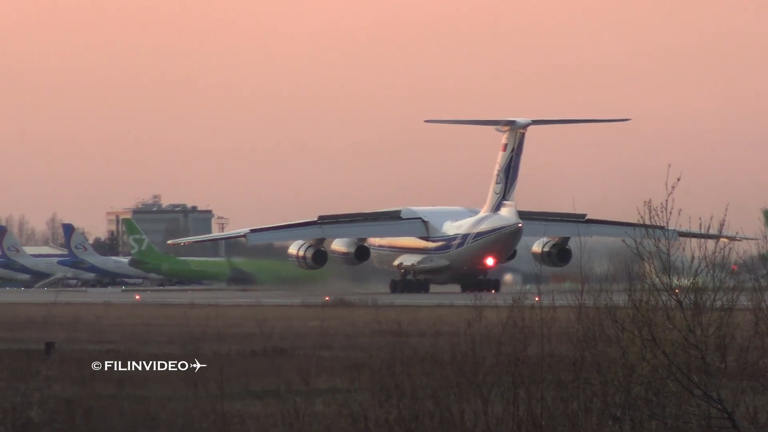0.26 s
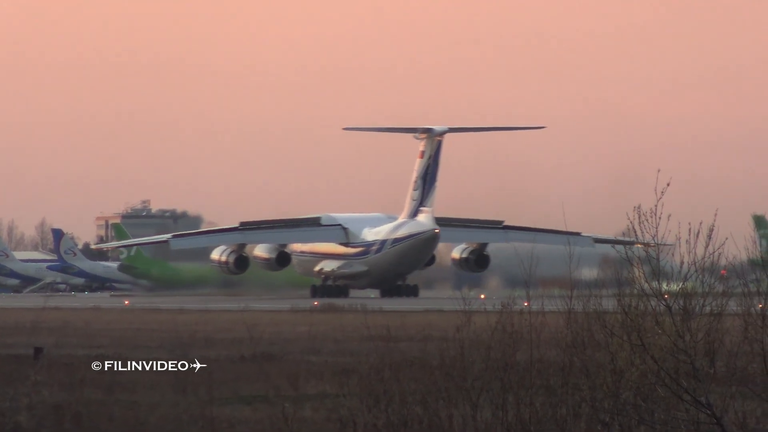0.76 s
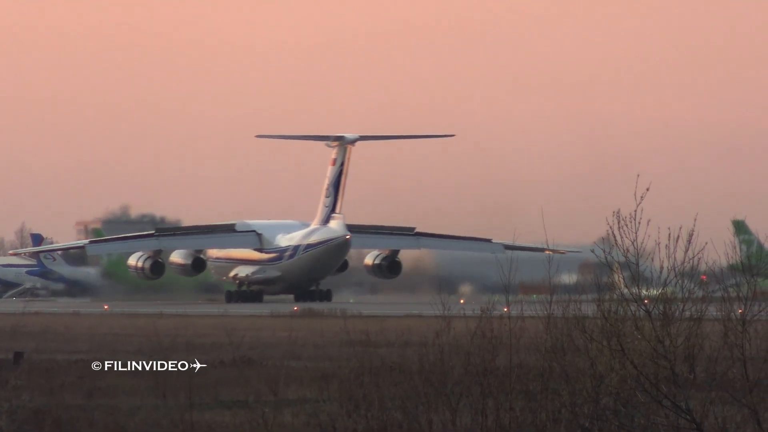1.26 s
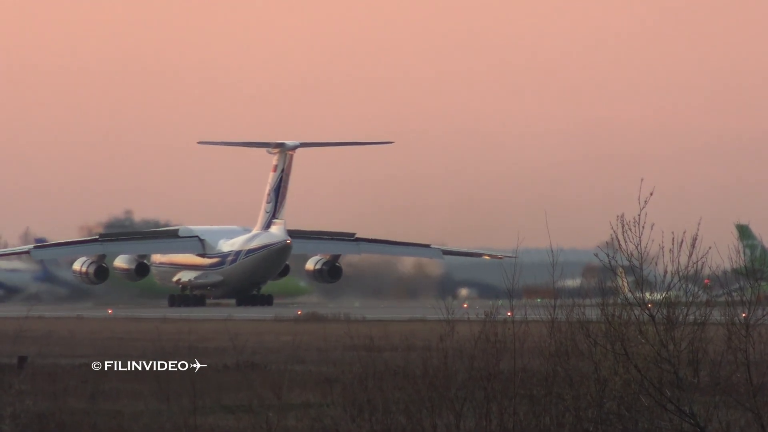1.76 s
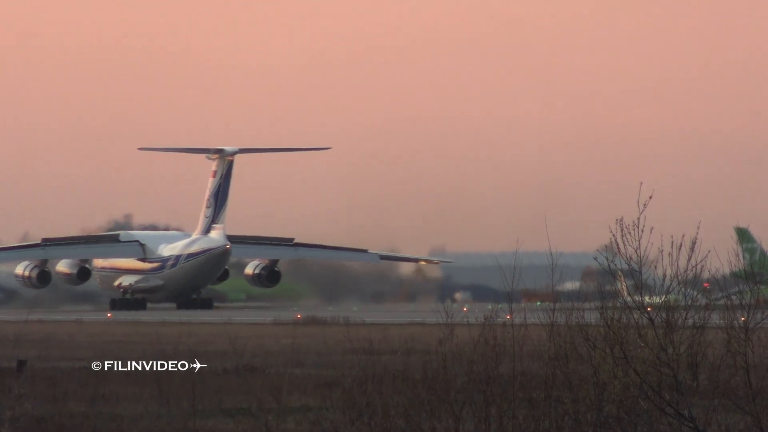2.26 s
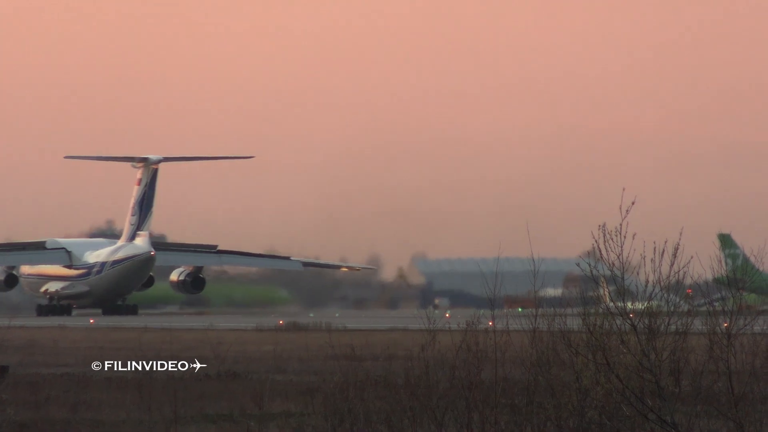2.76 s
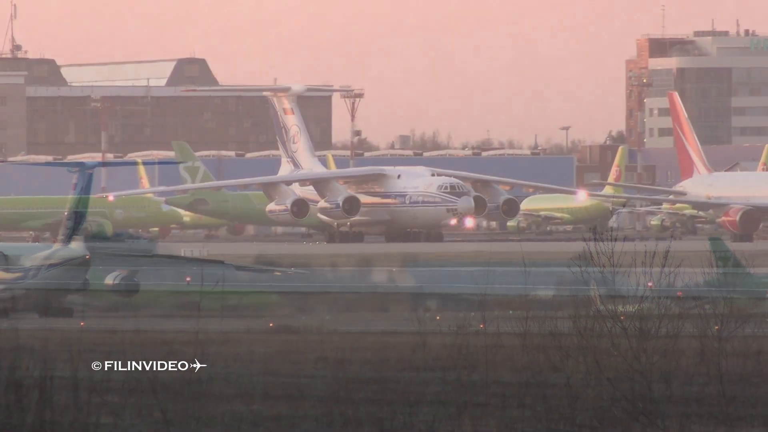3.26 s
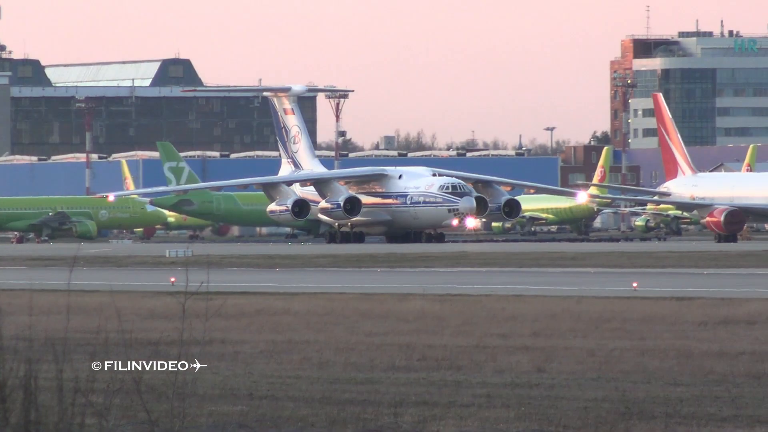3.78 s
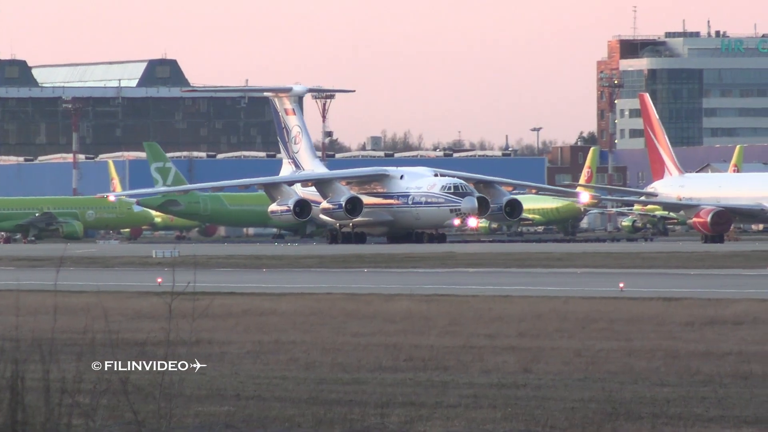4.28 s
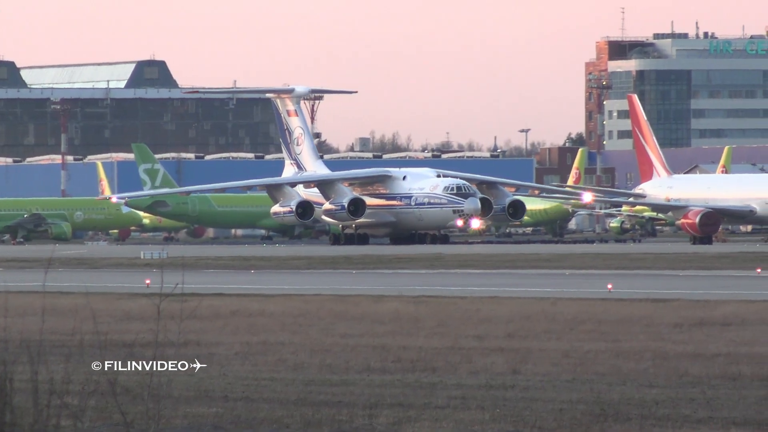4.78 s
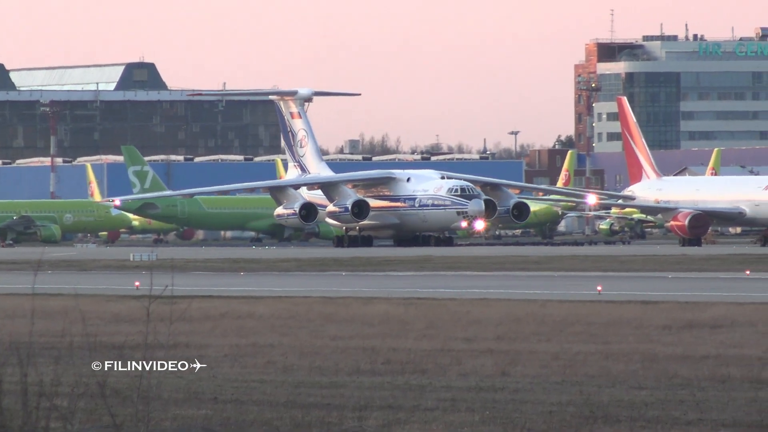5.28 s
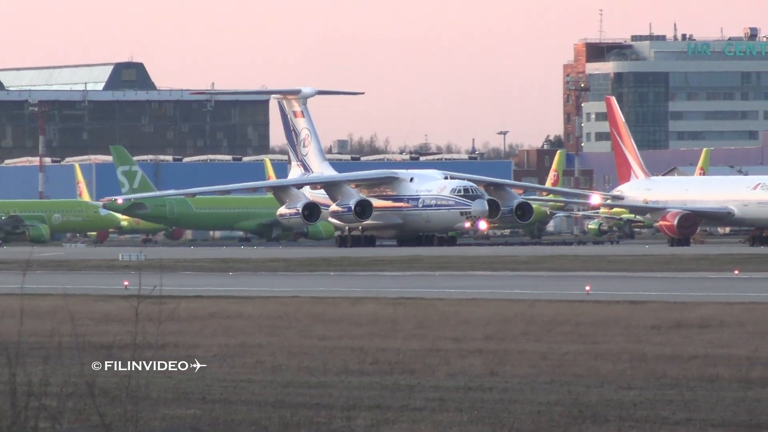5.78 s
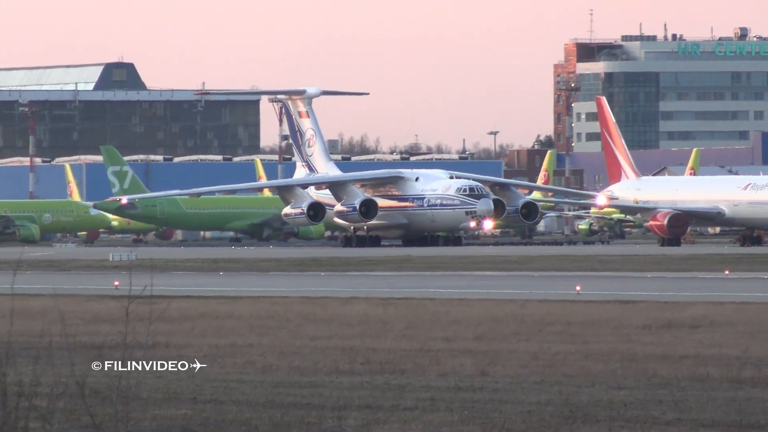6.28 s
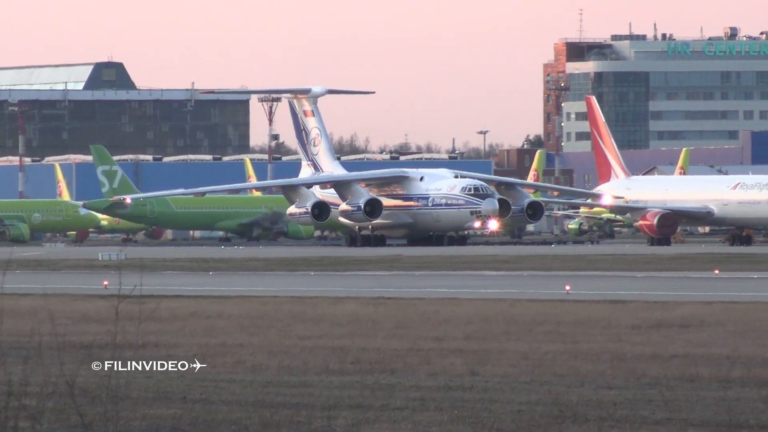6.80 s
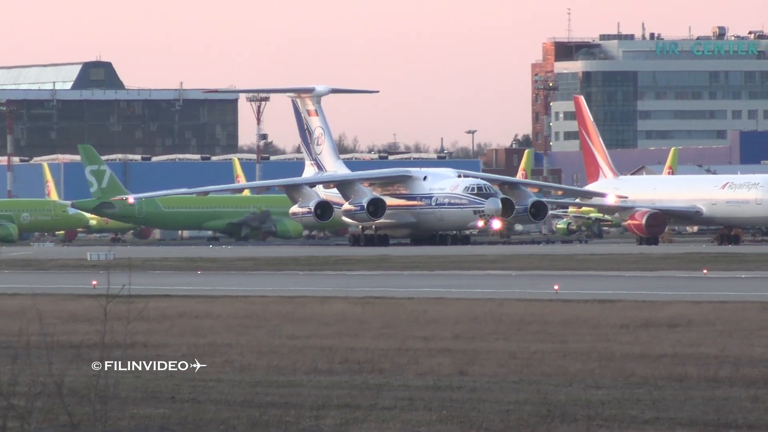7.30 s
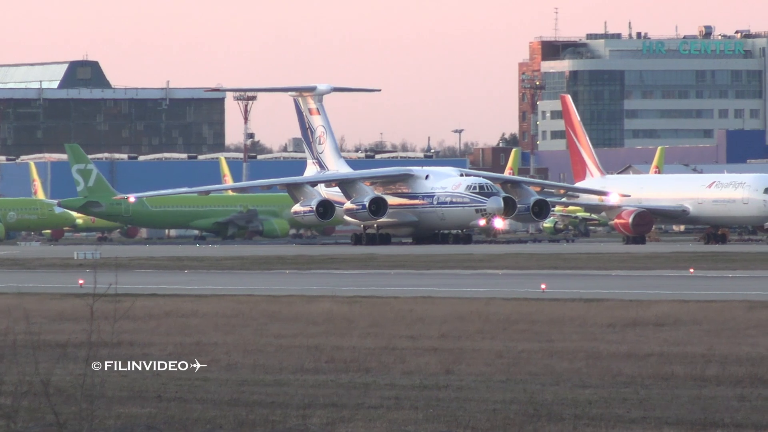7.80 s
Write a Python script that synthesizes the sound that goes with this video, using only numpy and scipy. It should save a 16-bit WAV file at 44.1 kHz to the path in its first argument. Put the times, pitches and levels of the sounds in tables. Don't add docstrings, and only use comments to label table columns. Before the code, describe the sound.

A distant four-engine jet in reverse thrust dominates an open airfield, heard through a camera microphone. From 0 s the roar is loud, broad and low-mid heavy, with little treble, wavering in rapid surges and dips, especially in the first second and again around 2.2 s. It eases slowly until about 5.5 s, then sinks more clearly to the end at 8 s, growing duller. Soft low wind puffs flutter on the microphone, most around 4-4.7 s. Tiny rustles begin near 1.5 s; from 4 to 5 s fingers shift with faint rustles, dull thumps and a short creak at 4.5 s. At 5.53 s a hard knock and a sharp, very brief crackling snap stand out. Small creaks follow, then cloth rubs thinly from 6.9 to 8 s, with a tiny click at 7.58 s. Faint hiss, patchy at first, steadily emerges as the roar falls.

```python
import sys
import numpy as np
from scipy import signal
from scipy.fft import rfft, irfft, next_fast_len
from scipy.io import wavfile
from scipy.ndimage import uniform_filter1d, minimum_filter1d, map_coordinates

SR = 44100
rng = np.random.default_rng(int(sys.argv[2]) if len(sys.argv) > 2 else 0)


def wrap_up_sound(samples):
    columns = np.atleast_2d(samples).T
    tamed = np.clip(columns, -1, 1)
    steps = np.round(tamed * 32767).astype(np.int16)
    wavfile.write(sys.argv[1], SR, steps)


def to_linear_factor(level_db):
    exponent = np.asarray(level_db, float) / 20
    return 10 ** exponent


N = 355005
FRAME = 1024

# [f/Hz, level per Hz/dB]
JET_DIRECT = [(50, -73), (85, -41), (108, -31.5), (142, -13.5), (165, -4), (226, -4.5), (283, -0.5),
              (345, -4), (566, -7), (658, -10), (1100, -19), (1260, -23.5), (1350, -24.5), (1940, -33.5),
              (3100, -67.5), (4030, -98), (6820, -120)]
# [f/Hz, level per Hz/dB]
JET_SCATTER = [(50, -55), (85, -28), (219, -11.5), (275, -6.5), (413, -1), (480, -3.5), (575, -3.5),
               (1130, -11), (1480, -18.5), (1720, -18), (3100, -58.5), (4030, -86.5), (6820, -120)]
SCATTER_DB = -16
# [f/Hz, width/Hz, level/dB]
BODY_COLOUR = [(180, 50, 1.5), (280, 60, 4), (352, 25, -2.5), (422, 25, -2), (465, 50, 1.5),
               (650, 35, -3.5), (570, 70, 3), (1080, 100, 3), (1380, 110, 3), (1680, 110, 3),
               (1970, 120, 2.5)]
# [t/s, level/dB]
THRUST = [(0, -13), (.5, -14), (.85, -14), (1.2, -15), (2, -15), (3, -15.5), (4, -16), (5, -17),
          (5.6, -17.5), (6.3, -19.5), (6.9, -20.5), (7.3, -22), (8.05, -22.5)]
DEEP_GAIN_DB_PER_S, MID_GAIN_DB_PER_S, AIR_LOSS_DB_PER_S = 0.35, 0.33, 0.98
TURN_S = 3.5
# [t/s, level/dB, centre f/Hz]
SURGES = [(.17, 3, 300), (.37, -6.5, 305), (.36, 5, 180), (.45, -4, 180), (.56, 6.5, 182), (.65, -4, 178.5),
          (.86, 5.5, 303), (.97, 4, 296), (2.1, 4, 302), (2.15, 2, 180), (2.26, 5.5, 300),
          (2.38, 5.5, 300.4), (.1, -7.5, 180), (3.27, 2, 180), (3.44, 4.5, 300), (6.2, 3, 280),
          (3.84, 4, 181), (4.0, 2.5, 298), (4.08, -6.5, 303), (4.05, -6, 180), (4.79, -9.5, 298),
          (5.83, -4.5, 300), (5.96, 2, 177), (6.09, -6.5, 180), (6.62, -4.5, 180), (6.85, 4.5, 298),
          (7.6, 7, 180), (7.85, 6, 300), (7.88, -8.5, 180), (6.65, 2.5, 280)]
SURGE_S, SURGE_OCTAVES = 0.042, 0.43

# [t/s, level/dB]
GUSTS = [(.16, -46), (.4, -53), (.82, -54.5), (1.22, -53.5), (1.42, -49), (1.55, -53.5), (2.35, -50.5),
         (2.86, -46), (3.21, -47), (3.46, -47), (3.66, -53), (4.08, -46), (4.2, -53), (4.39, -45),
         (4.52, -42), (4.68, -45.5), (5.19, -51), (5.45, -54), (6.07, -54), (7.6, -55), (8.0, -55)]
GUST_RISE_DB_PER_S, GUST_FALL_DB_PER_S = 250.5, 150
BREEZE_DB, BREEZE_FALL_DB_PER_S = -56, 0.95

# [f/Hz, level per Hz/dB]
HISS_COLOUR = [(2500, 0), (4000, 0.5), (6000, -3), (9000, -6), (12000, -9), (15500, -12)]
# [t/s, length/s, level/dB, top f/Hz]
HISS_FLECKS = [(0.202, 0.3, -70.5, 4200), (0.417, .03, -72, 10000), (.93, 0.036, -73, 10000),
               (1.147, 0.033, -72.5, 9000), (1.217, .07, -70.5, 10000), (1.302, 0.11, -74.5, 6000),
               (1.398, 0.051, -73.5, 10500), (1.5, .06, -72.5, 10000), (1.57, .04, -67, 11500),
               (1.637, .03, -70.5, 11900), (1.72, 0.026, -72, 10500), (1.82, 0.1, -70.5, 11000),
               (1.89, .05, -71, 5500), (2.078, 0.088, -72, 5000), (2.147, .03, -74, 12000),
               (2.28, 0.14, -69.5, 6000), (2.42, .18, -70.5, 5500), (2.6, .03, -70, 12000),
               (2.703, .03, -71.5, 10500), (2.76, .04, -71, 10500), (2.847, .06, -70.5, 9500),
               (3.088, .03, -69.5, 10000), (3.15, .03, -72, 6500), (3.26, .03, -71, 7000),
               (3.42, .28, -71, 5500), (3.58, .025, -71, 12000), (3.64, .03, -68.5, 10000),
               (3.69, 0.027, -70, 9500), (3.812, .03, -75.5, 9500)]
# [t/s, level/dB, top f/Hz]
HISS_BED = [(3.8, -110, 10000), (3.9, -92.5, 10500), (4.2, -77.5, 11800), (4.9, -77.5, 11800),
            (5.05, -82.5, 11800), (5.48, -88, 11800), (5.65, -79, 11540), (6.2, -77.5, 12550),
            (6.35, -75.5, 14960), (6.85, -77.5, 15820), (7.4, -73, 15630), (8.05, -73.5, 15650)]
OPEN_SHARE, BED_SHARE_PER_S = 0.6, 0.25
HISS_FLOOR_DB, PATCH_DB, FLICKER_DB = -110, 3.0, 2.5

# [t/s, peak level/dB, length/s, left-right/dB]
RUSTLES = [(1.556, -71.5, 0.03, 0), (2.154, -77, .03, -1), (3.644, -75, .025, 2), (4.059, -67, 0.036, 4),
           (4.132, -75.5, .065, -1), (4.2, -77, .025, 1.5), (4.26, -77, .025, 0.5), (4.344, -77, .03, 1.5),
           (4.384, -77.5, .043, 2), (4.5, -75.5, 0.046, 4), (4.625, -57, .05, 4), (4.728, -67, 0.048, 2),
           (4.775, -67.5, .054, 3.5), (4.839, -74.5, .035, 1), (4.882, -78.5, 0.046, 1.5),
           (5.223, -69, 0.05, -4.5), (5.264, -77, .03, 1), (5.364, -75, .05, .5), (5.545, -63, 0.011, -.5),
           (5.586, -62.5, .031, -4), (5.926, -69, .02, .5), (6.147, -72.5, 0.018, 2),
           (6.303, -74, .015, -5), (7.58, -55, 0.0031, 2)]
RUSTLE_HZ, RUSTLE_OCTAVES = 5300, 1.6
# [t/s, peak level/dB, length/s, f/Hz]
CREAKS = [(4.481, -61, .008, 5000), (4.48, -56.5, .008, 2700), (4.484, -48, .007, 3760),
          (4.48, -74.5, .04, 7500), (5.225, -69, .04, 3580), (5.227, -71, .06, 6800),
          (6.304, -71, .012, 5000), (3.64, -73, .02, 4400), (4.4, -78, .05, 3500), (4.58, -73.5, .05, 4800),
          (4.78, -71, 0.11, 3500), (4.98, -83, .1, 4200), (5.536, -39, 0.0082, 3440),
          (5.629, -67, .015, 3600), (5.625, -66, 0.018, 7700), (7.579, -55, .006, 5470),
          (7.58, -60, .006, 3200), (5.67, -80, 0.075, 8000), (5.9, -69, .035, 3510),
          (5.905, -72, .04, 7460), (6.17, -82, .08, 7900), (6.38, -78, 0.074, 3280),
          (6.522, -75.5, .06, 3200), (6.61, -75, 0.084, 3300), (6.77, -76, 0.043, 3300),
          (6.802, -83, .14, 7600)]
CREAK_OCTAVES, CREAK_LEFT_DB = 0.22, 2.5
# [t/s, level/dB, f/Hz]
THUMPS = [
    (4.08, -48, 50),
    (4.38, -47.5, 60),
    (4.5, -45.5, 45),
    (4.76, -52, 48.3),
    (5.55, -34.5, 58),
]
# [t/s, level/dB]
SNAP = [
    (5.5315, -38),
    (5.5405, -40),
    (5.5435, -58),
]
SNAP_LOW_HZ, SNAP_HIGH_HZ, SNAP_DB = 1400, 10800, 3.5

# [t/s, length/s, from f/Hz, to f/Hz, level/dB]
RUB_SLIPS = [(6.888, .09, 5870, 6100, -81.5), (6.974, .11, 6400, 6360, -74.5), (7.06, .16, 5500, 5300, -77),
             (7.159, .03, 4600, 4500, -70), (7.175, .035, 4500, 3900, -65.5), (7.2, .08, 3550, 3600, -68),
             (7.27, 0.19, 3950, 3950, -65), (7.401, .3, 3750, 3900, -72), (7.45, .13, 4700, 4500, -76),
             (7.2, .1, 4300, 4200, -77), (7.58, .2, 4920, 4900, -75), (7.59, .1, 4300, 4300, -76),
             (7.71, .08, 6000, 6500, -79), (7.787, 0.21, 7800, 7660, -72), (7.82, .2, 8600, 9000, -78)]
RUB_ATTACK_SHARE = 0.3


def rms_one(x):
    return x / np.sqrt(np.mean(x ** 2) + 1e-20)


def at_hz(points, hz):
    table_hz, table_db = np.transpose(points)
    return np.interp(np.log(hz + 1), np.log(table_hz), table_db)


def coloured(db_of_hz, channels=1):
    size = next_fast_len(N)
    hz = np.arange(size // 2 + 1) * SR / size
    gain = to_linear_factor(db_of_hz(hz))
    white = rng.standard_normal((channels, size))
    return irfft(rfft(white) * gain, size)[:, :N] / np.sqrt(np.mean(gain ** 2))


def shaped(x, db_of_hz_s):
    hz, s, z = signal.stft(x, SR, nperseg=FRAME, boundary="odd")
    gain = to_linear_factor(db_of_hz_s(hz[:, None], s[None]))
    return signal.istft(z * gain, SR, nperseg=FRAME)[1][..., :N]


def panned(x, left_db):
    return x * to_linear_factor([[left_db / 2], [-left_db / 2]])


def widened(common, own, apart_db):
    return common + to_linear_factor(apart_db) * own * [[1], [-1]]


def jet(patchy_db, lean_db):
    bass_cut_hz = JET_DIRECT[0][0]

    def direct_db(hz):
        edges = -80 * (hz < bass_cut_hz) - 0.017 * np.maximum(hz - 3100, 0)
        body = sum(db / (1 + (2 * (hz - f) / width) ** 2) for f, width, db in BODY_COLOUR)
        return at_hz(JET_DIRECT, hz) + edges + body

    def scatter_db(hz):
        edges = -80 * (hz < bass_cut_hz) - 0.03 * np.maximum(hz - 3100, 0)
        return at_hz(JET_SCATTER, hz) + edges

    def path_db(hz, s):
        deep_share = np.clip((240 - hz) / 60, 0, 1)
        mid_share = np.clip((hz - 380) / 160, 0, 1)
        treble_share = np.clip((hz - 900) / 900, 0, 2.2)
        turn = deep_share * DEEP_GAIN_DB_PER_S + mid_share * MID_GAIN_DB_PER_S
        turn = turn - treble_share * AIR_LOSS_DB_PER_S
        db = np.interp(s, *np.transpose(THRUST)) + turn * (s - TURN_S)
        for at, surge_db, centre_hz in SURGES:
            moment = np.exp(-((s - at) / SURGE_S) ** 2)
            band = np.exp(-(np.log2((hz + 1) / centre_hz) / SURGE_OCTAVES) ** 2)
            db = db + surge_db * moment * band
        cells = rng.standard_normal((48, 40))
        grid = np.broadcast_arrays(np.clip(hz / 80, 0, 47), s * 4.8)
        return db + patchy_db * map_coordinates(cells, grid, order=1)

    direct = coloured(direct_db)[0]
    side = coloured(scatter_db)[0]
    return to_linear_factor(1.5) * shaped(widened(panned(direct, lean_db), side, SCATTER_DB), path_db)


def wind(centre_hz, apart_db):
    common, own = coloured(lambda hz: -16 * np.log2((hz + 1) / centre_hz) ** 2, channels=2)
    t = np.arange(0, N / SR + 0.01, 0.005)
    puffs = []
    for s, db in GUSTS:
        drop_db = np.where(t < s, GUST_RISE_DB_PER_S * (s - t), GUST_FALL_DB_PER_S * (t - s))
        puffs.append(to_linear_factor(db - drop_db))
    breeze = to_linear_factor(BREEZE_DB - BREEZE_FALL_DB_PER_S * t)
    strength = np.hypot(breeze, np.max(puffs, axis=0))
    return np.interp(np.arange(N) / SR, t, strength) * widened(common, own, apart_db)


def hiss(apart_db, ragged_hz):
    common, own = coloured(lambda hz: at_hz(HISS_COLOUR, hz) - 40 * (hz < 2500), channels=2)
    times, level, tops = np.transpose(HISS_BED)

    def patches_db(hz, s):
        cell = (hz / 400).astype(int), (s * SR / FRAME).astype(int)
        luck = rng.random((56, 400))[cell]
        lumps = rng.standard_normal((56, 400))[cell]
        unfilled = luck > OPEN_SHARE + BED_SHARE_PER_S * (s - times[0])
        above_top = luck < (hz - np.interp(s, times, tops)) / ragged_hz
        flicker = FLICKER_DB * lumps[:1]
        db = np.interp(s, times, level) - 20 * unfilled - 30 * above_top + flicker
        for at, length, open_db, top_hz in HISS_FLECKS:
            shut = luck > OPEN_SHARE - np.maximum(hz - top_hz, 0) / ragged_hz
            db = np.maximum(db, open_db - 30 * shut - 25 * (2 * (s - at) / length) ** 4)
        return np.maximum(db + PATCH_DB * lumps, HISS_FLOOR_DB)

    return shaped(widened(common, own, apart_db), patches_db)


def rustles_and_creaks(patchy_db):
    out = np.zeros((2, N))
    t = np.arange(-4096, 4096) / SR
    puffs = [(s, db, length, RUSTLE_HZ, RUSTLE_OCTAVES, left_db) for s, db, length, left_db in RUSTLES]
    puffs += [(s, db, length, hz, CREAK_OCTAVES, CREAK_LEFT_DB) for s, db, length, hz in CREAKS]
    for s, db, length, hz, octaves, left_db in puffs:
        half_band = 2 ** (octaves / 2)
        edges = [hz / half_band, min(hz * half_band, 0.44 * SR)]
        band = signal.butter(3, edges, "band", fs=SR, output="sos")
        noise = rms_one(signal.sosfilt(band, rng.standard_normal(len(t))))
        swell = np.exp(-(2 * t / length) ** 2)
        start = round(s * SR) - len(t) // 2
        out[:, start:start + len(t)] += panned(to_linear_factor(db) * noise * swell, left_db)
    lumps = rng.standard_normal((40, 400))
    return shaped(out, lambda hz, s: patchy_db * lumps[(hz / 600).astype(int), (s * 30).astype(int)])


def thumps():
    out = np.zeros((2, N))
    t = np.arange(8192) / SR
    swell = t / 0.02 * np.exp(1 - t / 0.02)
    for s, db, hz in THUMPS:
        out[:, round(s * SR):][:, :len(t)] += to_linear_factor(db) * swell * np.sin(2 * np.pi * hz * t)
    return out


def snap():
    times, db = np.transpose(SNAP)
    band = signal.butter(3, [SNAP_LOW_HZ, SNAP_HIGH_HZ], "band", fs=SR, output="sos")
    common, own = rms_one(signal.sosfilt(band, rng.standard_normal((2, N))))
    level_db = SNAP_DB + np.interp(np.arange(N) / SR, times, db, -200, -200)
    return panned(to_linear_factor(level_db) * widened(common, own, apart_db=-14), -1.5)


def rub(width_hz):
    out = np.zeros(N + SR)
    low = signal.butter(2, width_hz / 2, fs=SR, output="sos")
    for s, length, from_hz, to_hz, db in RUB_SLIPS:
        draws = rng.standard_normal((3, SR // 2))
        u = np.arange(draws.shape[1]) / SR / length
        wander = np.repeat(draws[2, ::900], 900)[:len(u)]
        hz = (from_hz + (to_hz - from_hz) * u) * (1 + 0.02 * wander)
        turn = 2 * np.pi * np.cumsum(hz) / SR
        a, b = rms_one(signal.sosfilt(low, draws[:2]))
        swell = np.sqrt(np.interp(u, [0, RUB_ATTACK_SHARE, 1], [0, 1, 0]))
        out[round(s * SR):][:len(u)] += to_linear_factor(db) * swell * (a * np.cos(turn) + b * np.sin(turn))
    return out[:N]


def limited(x, top, size=441):
    peak = np.abs(x).max(axis=0)
    room = minimum_filter1d(np.minimum(1, top / (peak + 1e-9)), size=size)
    gain = uniform_filter1d(uniform_filter1d(room, size=size // 2), size=size // 2)
    return x * gain


def scene():
    distant = jet(patchy_db=1.44, lean_db=0.34)
    air = wind(centre_hz=52, apart_db=-20.0) + hiss(apart_db=-3, ragged_hz=1500)
    hands = rustles_and_creaks(patchy_db=2.0) + thumps() + snap()
    return distant + air + hands + rub(width_hz=340)


def roll_off(x):
    return signal.sosfilt(signal.butter(12, 15750, fs=SR, output="sos"), x)


def record(dry):
    held = limited(dry, top=0.86)
    return roll_off(held)


dry = scene()
out = record(dry)
wrap_up_sound(out)
```